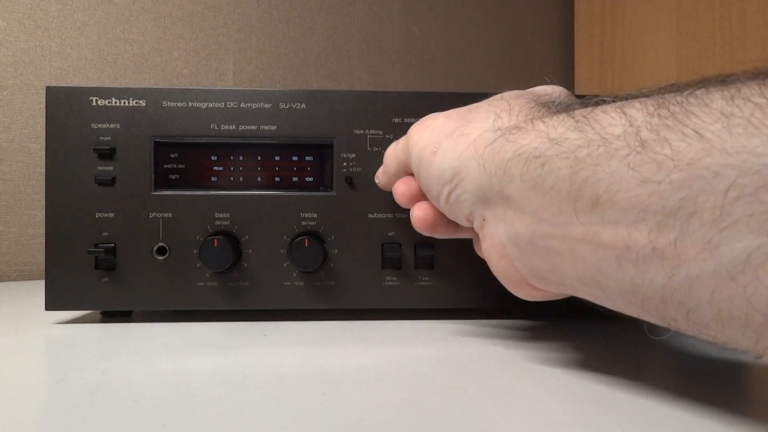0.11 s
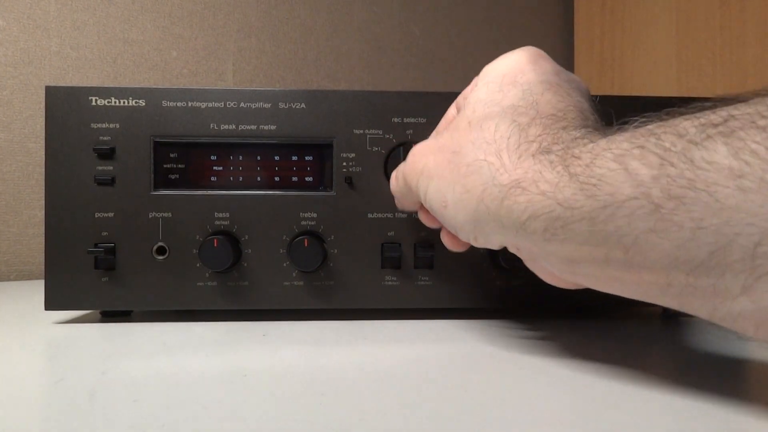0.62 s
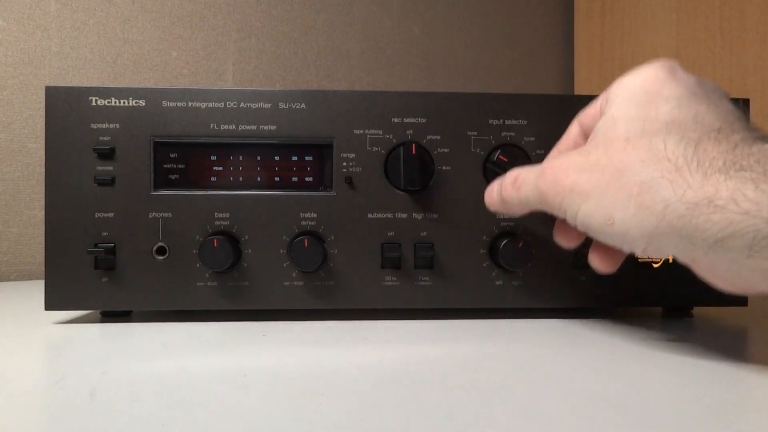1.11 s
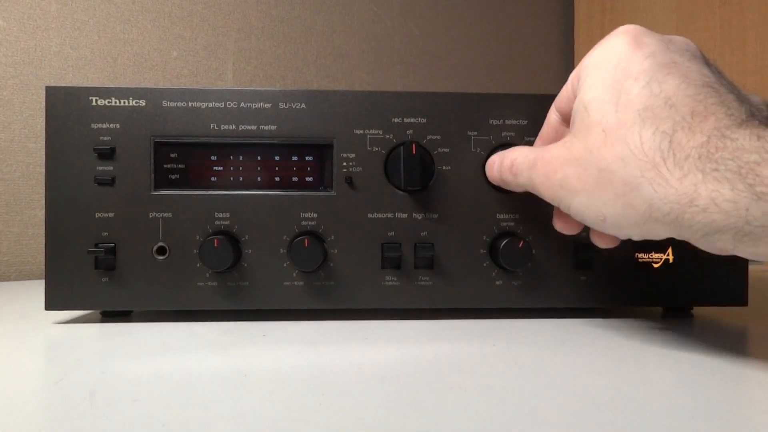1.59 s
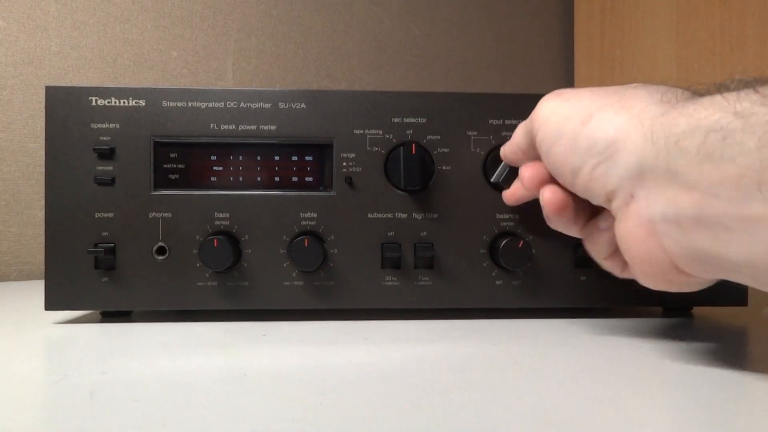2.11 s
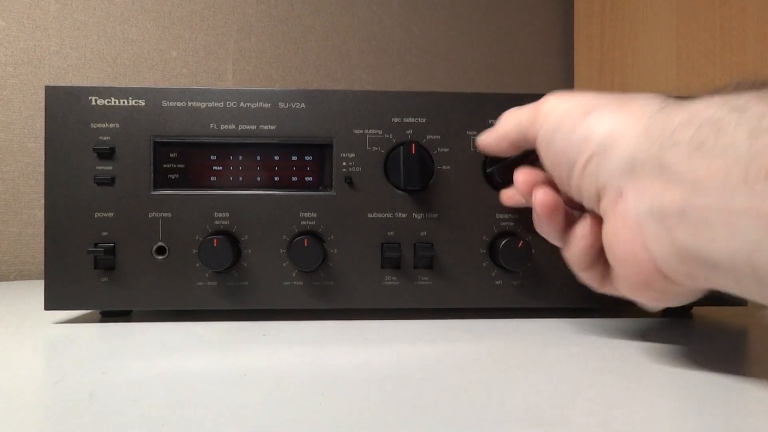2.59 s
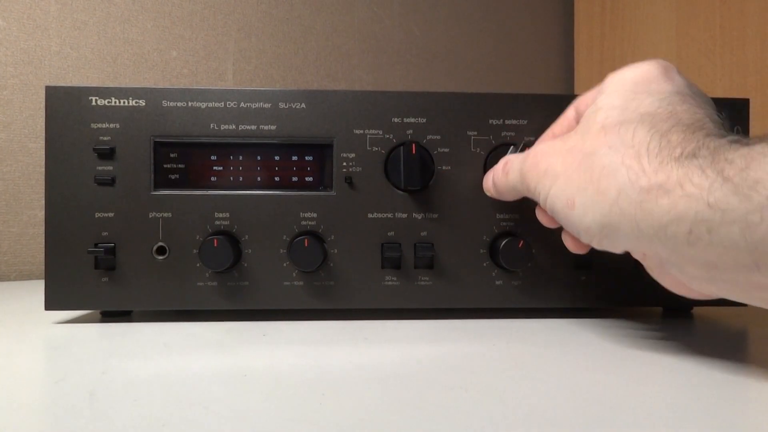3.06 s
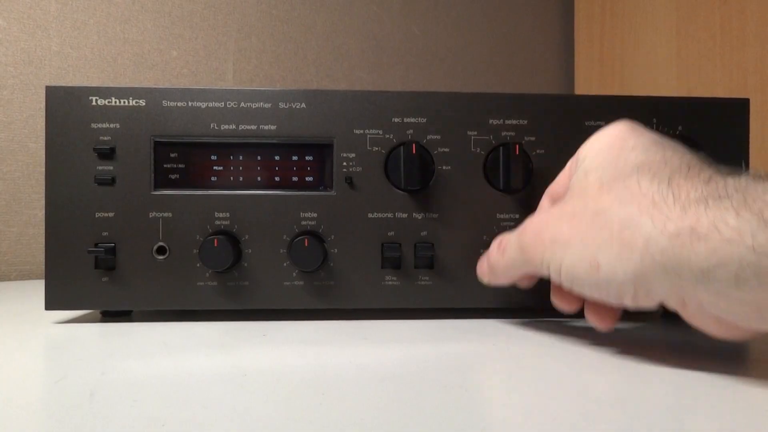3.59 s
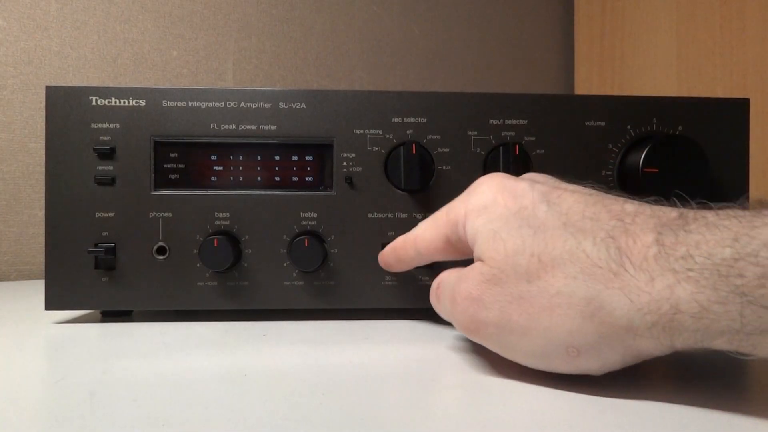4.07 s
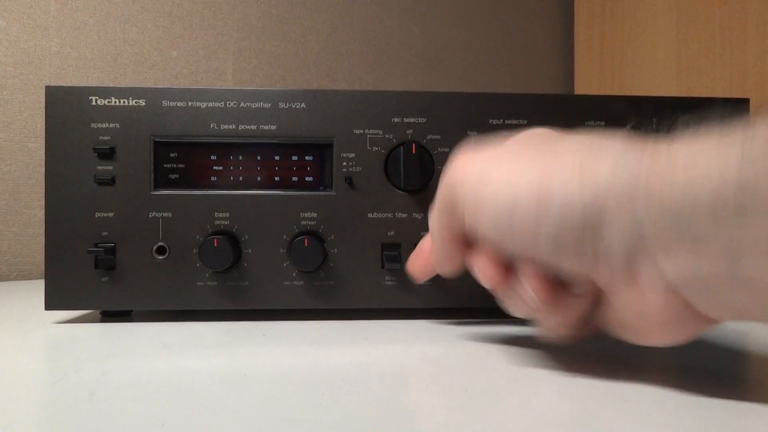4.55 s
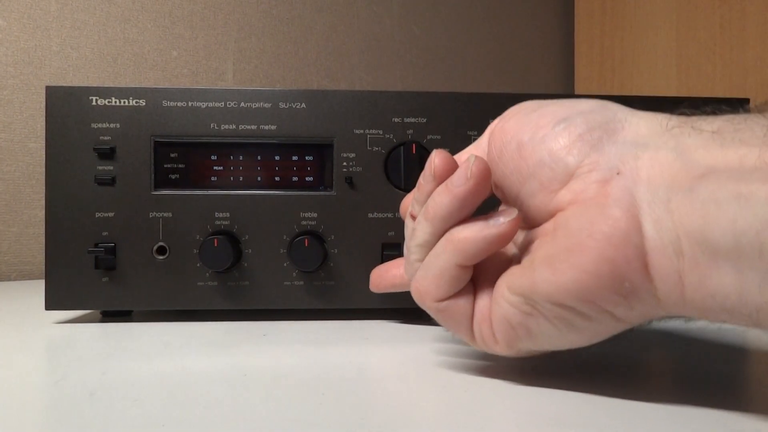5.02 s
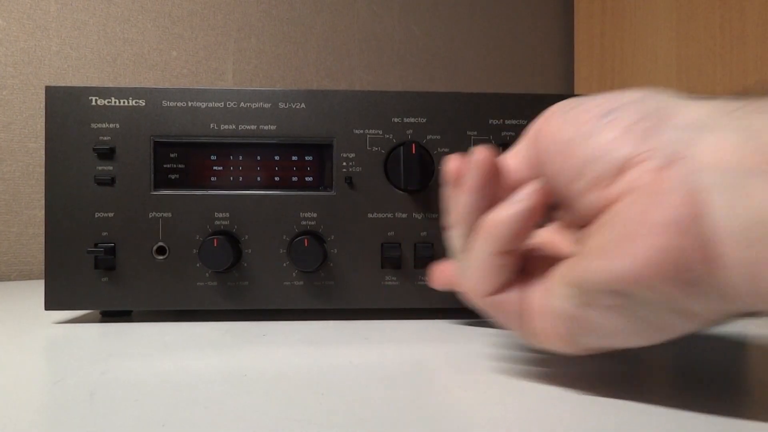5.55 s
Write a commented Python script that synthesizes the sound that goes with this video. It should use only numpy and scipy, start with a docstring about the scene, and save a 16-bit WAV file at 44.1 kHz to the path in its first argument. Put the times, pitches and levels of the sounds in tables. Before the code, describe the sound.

Hand works hi-fi controls indoors: nine clattery knob detents, quiet finger rubbing, then four hard switch clacks, with tiny camera motor ticking underneath.

```python
"""A hand turns the click-stop knobs and flips the lever switches of an amplifier on a table.
Each snap is a clatter of tiny impacts that also shakes the sheet-metal case and the small room.
Fingers tap and slide on the panel in between: skin slips in small grains, and touched parts ring.
A camera's focus motor ticks in step with its frame clock. Below lie shaped-noise hiss, low hum
and a faint, fuzzy high whine, and a low rumble with thuds from the hand's weight."""
import sys
import numpy as np
from scipy import signal
from scipy.fft import rfft, irfft
from scipy.io import wavfile

SR = 44100
rng = np.random.default_rng(int(sys.argv[2]) if len(sys.argv) > 2 else 0)


def linear_from_db(decibels):
    """Turn decibels (scalar or array-like) into linear amplitude factors; 0 gives 1."""
    return 10 ** (np.asarray(decibels, float) / 20)


def waveform_to_disk(signal):
    """Save audio, clipped to [-1, 1], as 16-bit WAV at the path in sys.argv[1]."""
    frames = np.transpose(np.atleast_2d(signal))
    scaled = np.clip(frames, -1, 1) * 32767
    samples = np.round(scaled).astype(np.int16)
    wavfile.write(sys.argv[1], SR, samples)


N = 249606  # length in samples


def read(points, hz):
    """Reads a table between its points on a log-frequency axis."""
    f, value = np.transpose(points)
    return np.interp(np.log(hz + 1), np.log(f + 1), value)


def evened(x):
    """Scales a sound to rms 1."""
    return x / np.sqrt(np.mean(x ** 2) + 1e-20)


def add(mix, s, sound):
    """Mixes a sound into a stereo mix at time s."""
    part = mix[:, max(round(s * SR), 0):][:, :sound.shape[1]]
    part += sound[:, :part.shape[1]]


def causal(gain_db):
    """Turns a gain curve in dB into a minimum-phase response, which starts as promptly as it can."""
    log_gain = np.log(linear_from_db(np.concatenate([gain_db, gain_db[-2:0:-1]])))
    return np.fft.ifft(np.exp(np.conj(signal.hilbert(log_gain)))).real[:len(gain_db)]


def noise(count, size, same, level_db):
    """Stereo noise of rms 1, shaped by level_db(Hz, s), with left-right likeness from a table."""
    hop = size // 4
    hz = np.fft.rfftfreq(size, 1 / SR)[:, None]
    t = np.arange(count // hop + 5) * hop / SR
    a, b, c, d = rng.standard_normal((len(t), len(hz), 4)).T
    like = np.clip(read(same, hz), -1, 1)
    mid = np.sqrt(1 + like) * (a + 1j * b)
    side = np.sqrt(1 - like) * (c + 1j * d)
    spectrum = np.array([mid + side, mid - side]) * linear_from_db(level_db(hz, t))
    return evened(signal.istft(spectrum, nperseg=size, noverlap=size - hop)[1][:, :count])


# low modes of the case: f/Hz, relative level/dB, t60/s
CASE_MODES = [(126, -1, 0.25), (173.4, -5, 0.18), (249.2, -0.5, 0.31), (341.2, -6, 0.45), (425, -12, 0.47),
              (463, -10.5, 0.45), (533, -3.5, 0.31), (579.2, -4.5, 0.19), (591, 5.5, 0.12),
              (623, -21, 0.66), (762, -5.5, 0.14), (962, -12.5, 0.34), (981.6, -13.5, 0.36),
              (1059, -13.5, 0.32), (1185, -10, 0.2), (1280, -6, 0.1), (1560, -6.5, 0.15),
              (2078, -6.5, 0.14), (2205, -28, 0.29), (2563, -11.5, 0.23), (3250, -46, 0.13),
              (3830, -11, 0.053), (4464, -10.5, 0.15)]
# starting colour of the dense haze: f/Hz, relative level/dB
HAZE_COLOUR = [(100, 3), (600, -5), (1500, -9.5), (10000, 2.5), (14000, 1)]
# decay of the haze of dense modes and room: f/Hz, t60/s
HAZE_T60 = [(100, 0.67), (400, 0.39), (1000, 0.31), (2700, 0.24), (7000, 0.28), (14000, 0.14)]
# stereo width of the haze: f/Hz, left-right likeness (1 = same)
HAZE_SAME = [(60, 0.95), (150, 1), (380, 0.7), (950, 0.66), (2380, 0.12), (5980, 0.66), (15000, 1)]
MODES_DB, HAZE_DB = -4, 4.5  # balance of modes and haze
LATE_DB, LATE_T60 = -38, 1  # slow end of the room's decay: level below its start, t60 in s


def haze_level(hz, s):
    """A fast decay runs into a slow one; bass builds up more slowly than treble."""
    fast = linear_from_db(-120 * s / read(HAZE_T60, hz))
    slow = linear_from_db(2 * LATE_DB - 120 * s / LATE_T60)
    build_up = 1 - np.exp(-(s + 0.00033) * (hz + 50) / 8)
    return read(HAZE_COLOUR, hz) + 10 * np.log10((fast + slow) * build_up)


def ringing():
    """Response of case and room: low modes plus a dense haze, drawn anew for each blow or slide."""
    t = np.arange(SR // 2 + SR // 5) / SR
    hz, db, t60 = np.transpose(CASE_MODES)[:, :, None]
    chance = rng.standard_normal((len(CASE_MODES), 4))
    left_right = chance[:, 2:].T[:, :, None]
    # left and right phases drift apart as frequency rises
    phase = 2 * chance[:, 1:2] + 0.32 * np.log(hz / 80) * left_right
    decay = linear_from_db(db + 1.05 * chance[:, :1] - 60 * t / t60)
    modes = decay * np.sin(2 * np.pi * hz * t + phase)
    modes *= 1 - np.exp(-t * hz / 1.17)
    haze = noise(len(t), 256, HAZE_SAME, haze_level)
    ring = linear_from_db(MODES_DB) * evened(modes.sum(1)) + linear_from_db(HAZE_DB) * haze
    return ring * (1 - np.exp(-t / 0.00067)) / np.sqrt(len(t))


# bands coloured by thump, panel, low body, high body, snap, sparkle: lower f/Hz, upper f/Hz
BLOW_BANDS = [(90, 380), (420, 680), (900, 1600), (1900, 2800), (3200, 5000), (6500, 10000)]
# what the direct clatter carries: f/Hz, gain level/dB
CRACK_COLOUR = [(150, -10), (500, -7), (1200, -3), (6000, 0.5), (14000, -3.5)]
# lead of the left microphone port over the right: f/Hz, phase/rad
PORT_LEAD = [(0, 0.16), (5000, 0.83), (6120, -0.022), (10400, 0.73), (10900, 0.35), (16300, -0.23)]


def blow(row, kind, radiation):
    """A clatter of tiny impacts is heard directly; its main impact sets the case ringing."""
    s, snap_db, panel, low_body, high_body, sparkle = row
    lead, clatter, ring_db, thump = kind
    t = np.arange(1300) / SR - .01  # the main impact falls at 0
    shape = np.where(t < 0, np.exp(t / lead), np.exp(-t / clatter))
    impacts = shape * rng.standard_normal(len(t)) * (0.14 + rng.exponential(1, len(t)))
    impacts /= np.linalg.norm(impacts)

    lo, hi = np.transpose(BLOW_BANDS)
    band_db = np.array([thump, panel, low_body, high_body, 0, sparkle])
    per_hz = band_db - 10 * np.log10((hi - lo) / 2000)  # a wide band spreads its level thinner
    hz = np.fft.rfftfreq(4096, 1 / SR)
    band_curve = read(np.transpose([np.sqrt(lo * hi), per_hz]), hz)
    colour = causal(band_curve + read(radiation, hz)) / 0.07

    ports = np.exp(.5j * np.outer([1, -1], read(PORT_LEAD, hz)))
    carried = rfft(causal(read(CRACK_COLOUR, hz)), 4096)
    crack = irfft(rfft(impacts, 4096) * rfft(colour, 4096) * carried * ports)
    main_impact = np.pad(colour, (SR // 100, 0))[None]
    sound = linear_from_db(ring_db) * signal.fftconvolve(main_impact, ringing(), axes=1)
    sound[:, :4096] += crack
    return s - .01, linear_from_db(snap_db) * sound


def spring(row):
    """A part rings as a cluster of nine close modes that beat against each other."""
    s, hz, db, t60 = row
    spread = .038  # scatter of the modes over their frequency
    t = np.arange(SR // 3) / SR
    detune, phase, side = rng.standard_normal((9, 3)).T[:, :, None]
    angle = 2 * np.pi * hz * (1 + spread * detune) * t + 3 * phase
    apart = .15 * np.log(hz / 80) * side  # left-right phase
    modes = np.array([np.sin(angle + c * apart).sum(0) for c in (1, -1)])
    return s, modes / np.sqrt(len(detune)) * linear_from_db(db - 60 * t / t60) * (1 - np.exp(-t / .004))


# snaps of the first knob: t/s, snap level/dB, then levels/dB beside the snap,
# before the radiation colour: panel ring, low body, high body, sparkle
FIRST_KNOB_SNAPS = [(0.099, -24.5, -22, -18, -10, -19), (0.3448, -27.5, -14.5, -16.5, -11, -19),
                    (0.5917, -25, -15, -22, -18.5, -18)]
# snaps of the second knob, same columns
SECOND_KNOB_SNAPS = [(1.698, -29.5, -9.5, -11.5, -8, -17.5), (1.8577, -36, -6, -24, -10, -17),
                     (2.0992, -27.5, -10.5, -17.5, -14.5, -26), (2.2214, -39, -2, -10, -2, -14),
                     (2.9233, -24.5, -8.5, -16, -11.5, -19.5), (3.2893, -24, -14, -17.5, -12.5, -23)]
# how the case radiates when the first knob snaps: f/Hz, gain level/dB
FIRST_KNOB_COLOUR = [(40, -17.5), (90, 11.5), (240, 7), (340, 8.5), (620, 4), (760, 0), (950, 7.5),
                     (2300, 4.5), (3000, -1.5), (4250, 2), (4800, 1.5), (5900, -9.5), (7400, 1), (9500, 1),
                     (11500, -16), (16000, -16)]
# how the case radiates when the second knob snaps: f/Hz, gain level/dB
SECOND_KNOB_COLOUR = [(40, -6), (90, 14), (170, 4), (250, 3), (340, -3), (620, -3), (760, -6), (950, 1),
                      (2300, 3.5), (3000, -5), (4250, 1), (4800, -2), (5900, -7), (7400, 1), (9500, -5),
                      (11500, -9.5), (16000, -6.5)]
# how each knob's blow lands: lead-in t/s, clatter decay t/s, ringing level/dB, table thump level/dB
FIRST_KNOB_BLOW = (0.0023, 0.0074, -3.5, -20)
SECOND_KNOB_BLOW = (0.0023, 0.0074, -3.5, -23)
# detent spring of the first knob: f/Hz, level/dB beside the snap, t60/s
DETENT_SPRING = (4550, -24, .25)


def knobs():
    """Click stops of two knobs strike the case; the first knob's detent spring rings on."""
    out = np.zeros((2, N))
    hz, db, t60 = DETENT_SPRING
    for row in FIRST_KNOB_SNAPS:
        s, snap_db = row[:2]
        add(out, *blow(row, FIRST_KNOB_BLOW, FIRST_KNOB_COLOUR))
        add(out, *spring((s, hz, snap_db + db, t60)))
    for row in SECOND_KNOB_SNAPS:
        add(out, *blow(row, SECOND_KNOB_BLOW, SECOND_KNOB_COLOUR))
    return out


# flips, left and right down, then left and right up: t/s, snap level/dB, then levels/dB beside the snap,
# before the radiation colour: panel ring, low body, high body, sparkle
LEVER_FLIPS = [(4.1018, -16, -7.5, -12.5, -6, -9), (4.4138, -14.5, -8.5, -20.5, -4.5, -13),
               (5.146, -15, -10, -6, -9.5, -21.5), (5.4475, -15, -11, -4.5, -9.5, -21.5)]
# how the case radiates when a lever snaps: f/Hz, gain level/dB
LEVER_COLOUR = [(40, -43), (90, 4.5), (620, 1.5), (780, -0.5), (950, 8), (2300, 6.5), (3200, 1), (4400, 1),
                (4900, -1), (5900, -7), (7400, 1), (9500, -3), (11500, -15), (16000, -13)]
# how a flip lands: lead-in t/s, clatter decay t/s, ringing level/dB, table thump level/dB
FLIP_BLOW = (0.00088, 0.0023, -2.5, -37)
# parts each lever leaves ringing: f/Hz, level/dB flipped down, level/dB flipped up, t60/s
LEFT_LEVER_PARTS = [(124.6, -60, -50, .39), (3280, -30.5, -33, .22), (4400, -55, -40, .26),
                    (7400, -33, -60, .16)]
RIGHT_LEVER_PARTS = [(124, -60, -47, .38), (2300, -46, -65, .4), (4950, -55, -31.5, .19)]


def levers():
    """Lever switches snap over in a short clatter and leave some of their parts ringing."""
    out = np.zeros((2, N))
    for k, row in enumerate(LEVER_FLIPS):
        add(out, *blow(row, FLIP_BLOW, LEVER_COLOUR))
        for hz, down, up, t60 in (LEFT_LEVER_PARTS, RIGHT_LEVER_PARTS)[k % 2]:
            add(out, *spring((row[0], hz, up if k > 1 else down, t60)))
    return out


# light touches: t/s, snap level/dB, then levels/dB beside the snap,
# before the radiation colour: panel ring, low body, high body, sparkle
FINGER_TOUCHES = [(0.063, -58, -21, -4, 6, -9), (0.0803, -46, -15, -7, 8.5, -23),
                  (0.2831, -58.5, -22, -10, -6, -22), (0.6793, -57, 1.5, -11, -2, -23),
                  (1.3445, -53, -22, -6.5, -6, -14.5), (1.5662, -63, 3, 2, 8, -15),
                  (1.8503, -41, -15, -17, 2.5, -23), (2.0914, -43.5, -16, -10.5, -5.5, -10.5),
                  (2.2151, -48, -3, -11, -3, -14), (2.8963, -54, -19, 7, 3, -2),
                  (4.7601, -48, -5.5, -1.5, 2, -22), (5.3721, -46.5, -1, -9.5, -7, -23)]
# how a touch lands: lead-in t/s, clatter decay t/s, ringing level/dB, table thump level/dB
FINGER_BLOW = (0.00069, 0.0023, -1.5, -15)
# ringing left in the panel by fingertips, or in the second knob's spring at 1.857 s:
# t/s, f/Hz, level/dB, t60/s
LEFT_RINGING = [(1.169, 503, -51, 0.5), (1.238, 515, -53, 0.3), (1.857, 2200, -56, 0.26),
                (5.369, 345, -50, .1), (5.369, 570, -39, 0.08), (5.369, 760, -47, .08)]


def touches():
    """Fingers bump the case like faint blows; the panel, and once the second knob's spring, rings on."""
    out = np.zeros((2, N))
    for row in FINGER_TOUCHES:
        add(out, *blow(row, FINGER_BLOW, FIRST_KNOB_COLOUR))
    for row in LEFT_RINGING:
        add(out, *spring(row))
    return out


def rub(row, width):
    """Skin slips in small grains that excite a resonance, then the case; width is over its frequency."""
    start, end, start_db, end_db, hz = row
    room_db, grains_per_s = -7.5, 3000
    count = round((end - start) * SR)
    grains = rng.standard_normal(count) * (0.62 + 3 * (rng.random(count) < grains_per_s / SR))
    r = np.exp(-np.pi * width * hz / SR)
    poles = [1, -2 * r * np.cos(2 * np.pi * hz / SR), r * r]
    slips = signal.lfilter([1, 0, -1], poles, grains)
    slips = evened(signal.lfilter([1, 0, -1], poles, slips))
    slips *= linear_from_db(np.linspace(start_db, end_db, count)) * signal.windows.tukey(count, .2)
    sound = linear_from_db(room_db) * signal.fftconvolve(slips[None], ringing(), axes=1)
    sound[:, :count] += slips
    return start, sound


# fingers sliding on knob or panel: start t/s, end t/s, start level/dB, end level/dB, loudest f/Hz
FINGER_RUBS = [(.06, 0.078, -51.5, -61, 2400), (0.307, 0.336, -81, -58, 1900),
               (1.169, 1.27, -77, -74, 3000), (1.667, 1.7, -74, -73, 2100), (2.318, 2.42, -68, -77, 3200),
               (2.894, 2.923, -51, -65, 2500), (4.084, 4.099, -49, -75, 2000),
               (4.322, 4.414, -64.5, -67, 3400), (4.392, 4.408, -55, -63, 1500),
               (5.1, 5.144, -77, -59, 1700), (5.326, 5.438, -59, -87, 3800),
               (5.426, 5.442, -50.5, -62, 2500)]
# slides that sound narrower and more pitched, same columns
FINGER_SQUEAKS = [(0.553, 0.602, -78, -56, 2300), (1.17, 1.29, -67, -76, 320),
                  (1.23, 1.31, -66, -81.5, 590), (1.333, 1.417, -64, -75, 3700),
                  (1.341, 1.389, -70, -75, 1600), (1.833, 1.865, -71, -44, 2700),
                  (3.261, 3.3, -75, -47, 2540), (3.821, 3.985, -71, -85, 673),
                  (4.858, 4.912, -64.5, -81, 950)]


def slides():
    """Fingers slide on knob or panel: wide resonances sound like rubbing, narrow ones squeak."""
    out = np.zeros((2, N))
    for rows, width in ((FINGER_RUBS, 1.15), (FINGER_SQUEAKS, 0.38)):
        for row in rows:
            add(out, *rub(row, width))
    return out


# ringing of the lens barrel after a step: f/Hz, relative level/dB, t60/s
BARREL_RING = [(3601, -7, 0.014), (3806, -1, 0.0062), (2760, -20, 0.007), (4800, -14, 0.0031)]


def barrel(steps):
    """Motor steps ring the lens barrel, louder on the left."""
    pan_db = 2.5  # up on the left, down on the right
    t = np.arange(900) / SR
    out = np.zeros((2, N))
    for c, pan in enumerate((1, -1)):
        ring = np.zeros(len(t))
        for k, (hz, db, t60) in enumerate(BARREL_RING):
            ring += linear_from_db(db - 60 * t / t60) * np.sin(2 * np.pi * hz * t + .5 * pan * k)
        ring *= 1 - np.exp(-t / 0.0014)
        out[c] = linear_from_db(pan * pan_db) * signal.oaconvolve(steps, ring / abs(ring).max())[:N]
    return out


# pitches the drive's whine picks from: f/Hz
WHINE_PITCHES = [9600, 9600, 9600, 8800, 9190, 7340, 10400]


def drive_whine(starts):
    """The drive whines briefly between frames, on a pitch drawn by chance that sags a little."""
    share, lowest_db = .6, -85  # chance of a whine in a frame; its quietest peak
    t = np.arange(900) / SR
    out = np.zeros((2, N))
    for s in starts:
        pick, choice, extra = rng.random(3)
        if pick < share:
            hz = WHINE_PITCHES[int(choice * len(WHINE_PITCHES))] * (1 - 0.45 * (t - .01))
            tone = np.sin(2 * np.pi * np.cumsum(hz) / SR) * signal.windows.tukey(len(t), .5)
            add(out, s, linear_from_db(lowest_db + 6 * extra) * tone[None])
    return out


# motor runs, frames of two levels in turn:
# start t/s, end t/s, first frame's level/dB, next frame's level/dB
MOTOR_RUNS = [(0, 0.24, -66, -70), (.75, 1.26, -59, -62.5), (1.3, 1.42, -60, -57), (1.43, 1.9, -59, -75),
              (1.91, 2.46, -58.5, -59.5), (2.47, 2.9, -60, -68), (2.99, 3.3, -60, -58.5),
              (3.39, 3.53, -57.5, -60), (4.55, 4.97, -57, -58), (5.03, 5.66, -62, -62)]
# single steps apart from the runs or off the frame clock: t/s, level/dB
SINGLE_STEPS = [(0.222, -58.5), (0.23, -54.5), (0.282, -63), (0.732, -55), (0.7413, -55), (1.435, -61),
                (3.435, -56), (3.532, -56), (4.281, -61)]


def focus_motor():
    """Steps on a 10 ms clock ring the barrel; the drive clicks every 20 ms and whines between frames."""
    clock_s, clock_start_s, frame_s = .01, .0008, .04
    small_step_db, drive_click_db = -73.5, -67.5  # lowest levels, chance adds to them
    knock_db, scatter_db = -4, 1.7  # knock of a frame's step beside its ring; scatter of its level
    beats = np.arange(clock_start_s, N / SR, clock_s)
    index = np.arange(len(beats))
    run_db = np.zeros(len(beats))
    for start, end, first_db, next_db in MOTOR_RUNS:
        turn_db = np.where((beats - start) // frame_s % 2, next_db, first_db)
        run_db += turn_db * ((beats > start) & (beats < end))
    on = run_db < 0

    steps, clicks = np.zeros(N), np.zeros(N)
    at = (beats * SR).astype(int)
    extra_db = -4.4 * np.log(1 - .95 * rng.random(len(beats)))
    steps[at] = on * linear_from_db(small_step_db + extra_db)
    frame = on & (index % 4 == 0)  # one main step per 40 ms frame
    frame_db = run_db + scatter_db * rng.standard_normal(len(beats))
    for s, db in SINGLE_STEPS + list(zip(beats[frame], frame_db[frame])):
        steps[int(s * SR)] = linear_from_db(db)
        clicks[int(s * SR)] = linear_from_db(db + knock_db)
    clicks[at] += on * (index % 2 == 0) * linear_from_db(drive_click_db + 10 * rng.random(len(beats)))
    bright_clicks = signal.lfilter([1, 0, -1], [1, -.7, .35], clicks)
    return barrel(steps) + bright_clicks + drive_whine(beats[on & (index % 4 == 1)])


# the hand's weight thuds into the table: peak t/s, level/dB
TABLE_THUDS = [(0.11, -73), (0.38, -71), (0.68, -64), (1.92, -74), (2.7, -75), (3.29, -72), (3.55, -75),
               (4.11, -66), (4.45, -62), (4.65, -74), (5.16, -63), (5.45, -61)]


def rumble():
    """Low noise from the shaking of table and floor swells with each thud of the hand's weight."""
    steady_db, rise_s, t60 = -81, .04, .5
    t = np.arange(N) / SR
    band = signal.butter(2, [25, 100], "band", fs=SR, output="sos")
    low = evened(signal.sosfilt(band, rng.standard_normal(N)))
    level = np.full(N, linear_from_db(steady_db))
    for s, db in TABLE_THUDS:
        rise = np.exp(np.minimum(t - s, 0) / rise_s)
        level += linear_from_db(db - 60 * np.maximum(t - s, 0) / t60) * rise
    return low * level


# low hum and a faint, fuzzy high whine: f/Hz, rms level/dB, width f/Hz, steady part over wavering part
BACKGROUND_TONES = [(103.5, -75, 4, 4.0), (250, -87, 6.4, 1.1), (7370, -89.5, 110, 0.35)]


def hum_and_fuzzy_whine():
    """Low hum and a faint, fuzzy high whine: each tone is partly steady, partly wavering."""
    t = np.arange(N) / SR
    out = np.zeros(N)
    for hz, db, width, steady in BACKGROUND_TONES:
        r = np.exp(-np.pi * width / SR)
        a, b = signal.lfilter([1], [1, -r], rng.standard_normal((N, 2)).T)
        waver = steady + evened(a) + 1j * evened(b)
        out += linear_from_db(db) * evened((waver * np.exp(2j * np.pi * hz * t)).real)
    return out


# colour of the hiss: f/Hz, relative level/dB per Hz
HISS_COLOUR = [(74, -22), (125, -7.5), (293, -9.5), (390, -7.5), (449, -8), (843, -10), (1240, -12),
               (1860, -16.5), (2140, -16), (5920, -24.5), (16000, -31.5)]
# stereo width of the hiss: f/Hz, left-right likeness (1 = same, -1 = opposite)
HISS_LIKENESS = [(60, 0.81), (130, 0.43), (290, 0.054), (640, -0.43), (1410, -0.42), (3100, 0.0066),
                 (6820, 0.71), (15000, 0.96)]


def hiss():
    """Microphone hiss: steady noise that falls off toward the treble, at -68.5 dB rms."""
    return linear_from_db(-68.5) * noise(N, 2048, HISS_LIKENESS, lambda hz, s: read(HISS_COLOUR, hz) + 0 * s)


def scene():
    """All sources at the microphone pair."""
    hand = knobs() + levers() + touches() + slides()
    return hand + focus_motor() + rumble() + hum_and_fuzzy_whine() + hiss()


def top_cut(x):
    """Nothing passes above the cut-off."""
    return signal.sosfilt(signal.butter(12, 16670, fs=SR, output="sos"), x)


def record(dry):
    """Turns the finished mix into the final sound."""
    return top_cut(dry)


dry = scene()
out = record(dry)
waveform_to_disk(out)
```